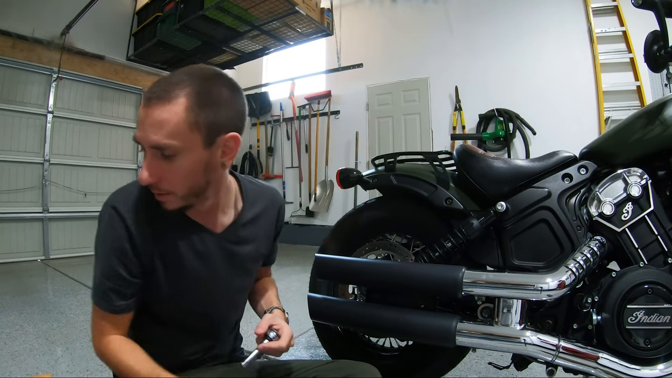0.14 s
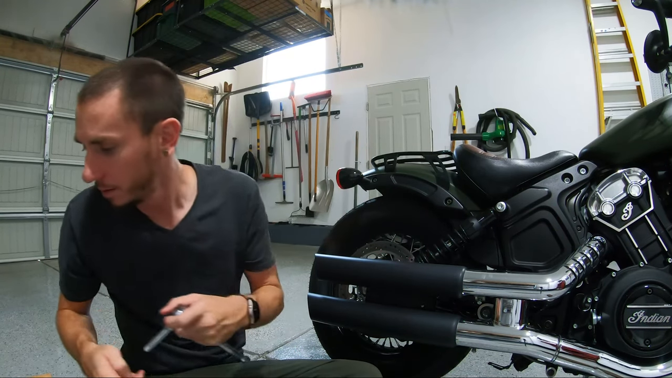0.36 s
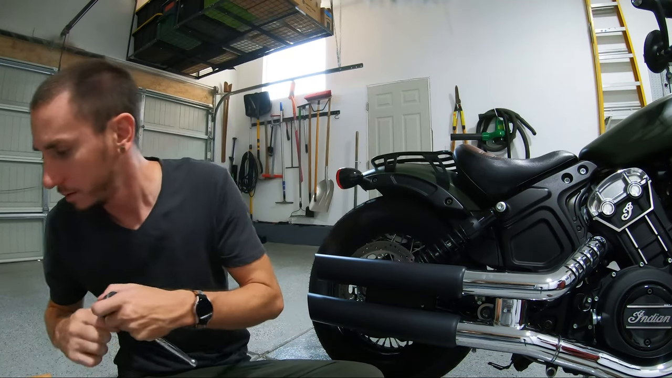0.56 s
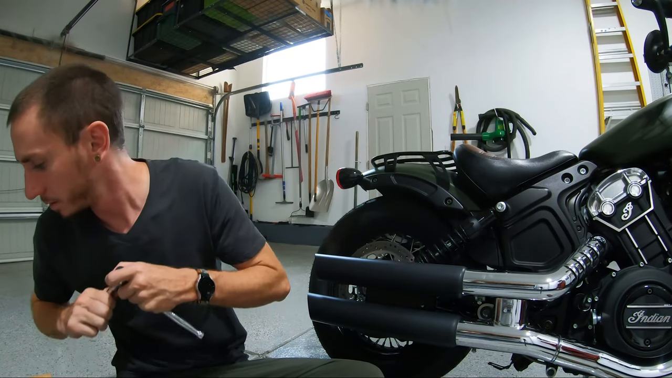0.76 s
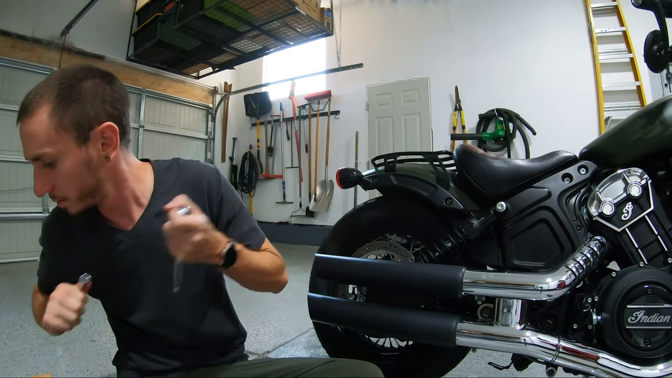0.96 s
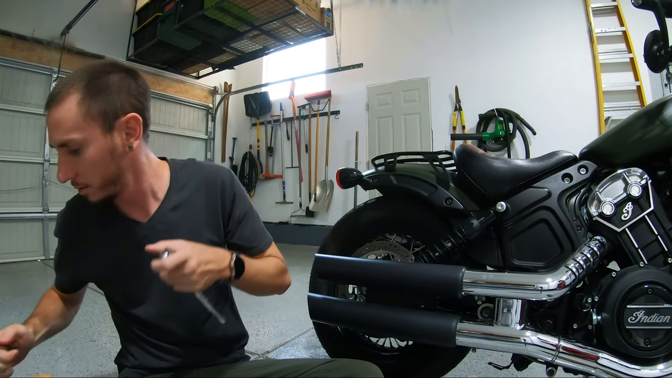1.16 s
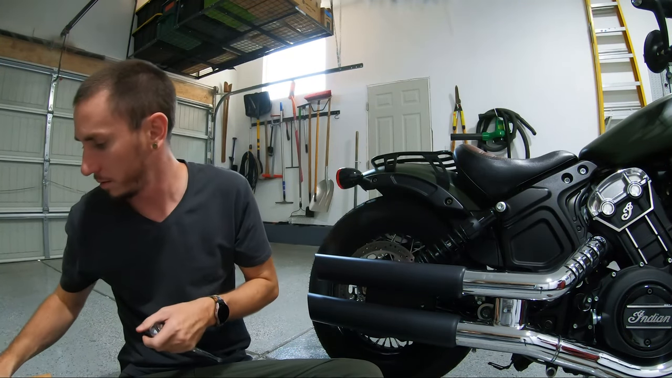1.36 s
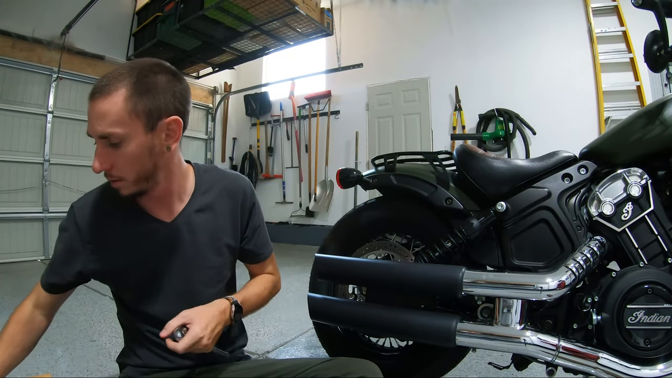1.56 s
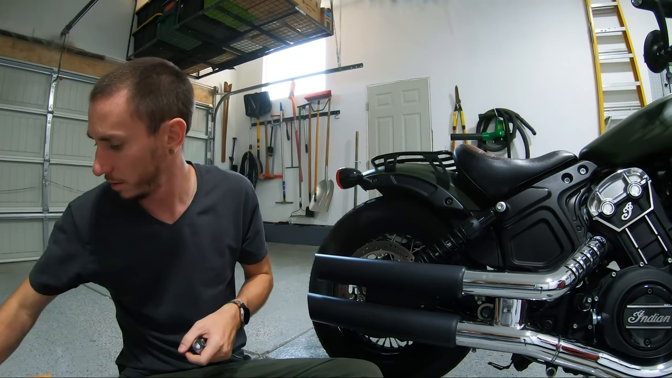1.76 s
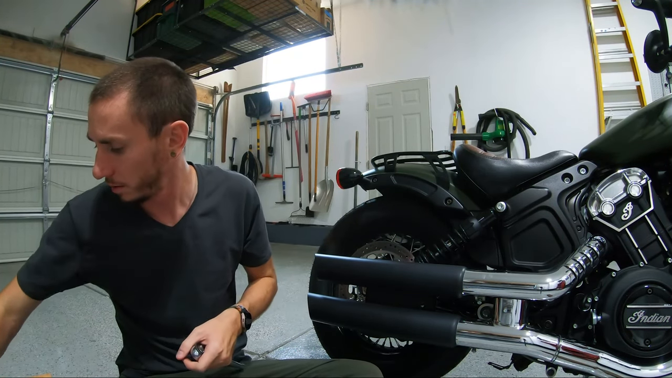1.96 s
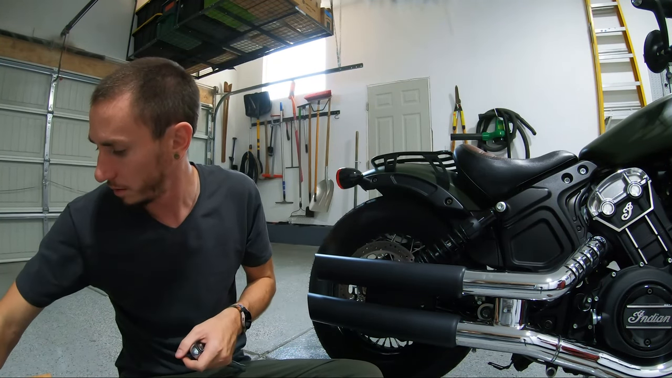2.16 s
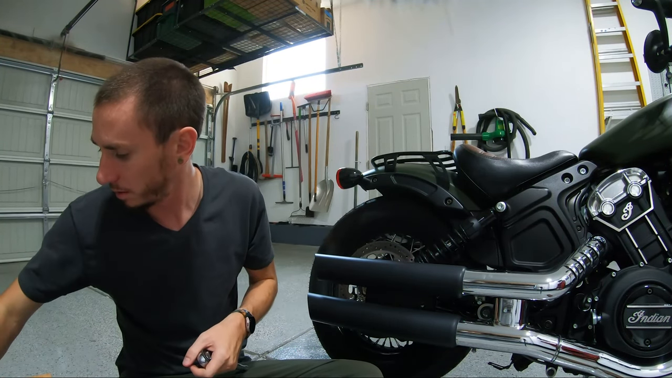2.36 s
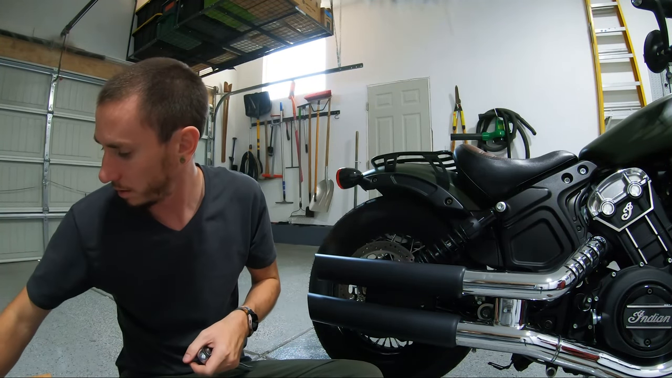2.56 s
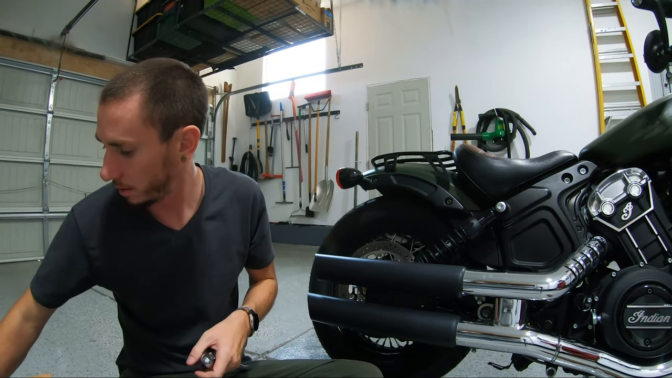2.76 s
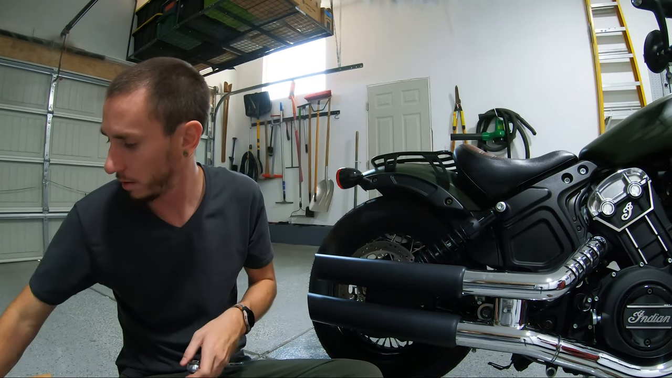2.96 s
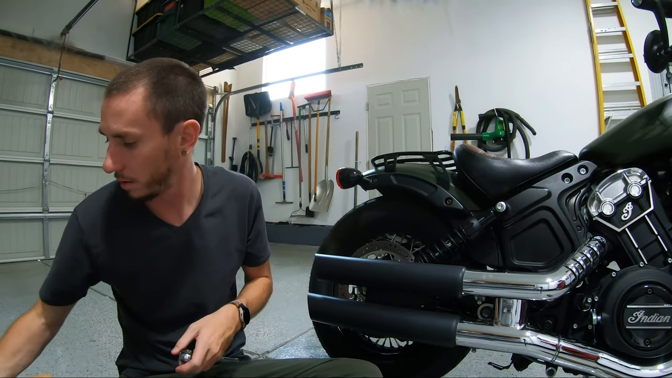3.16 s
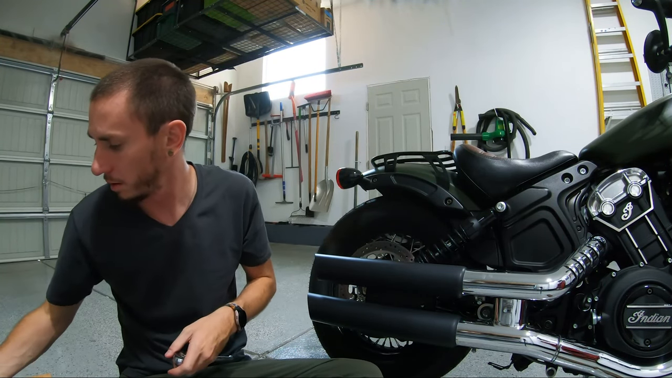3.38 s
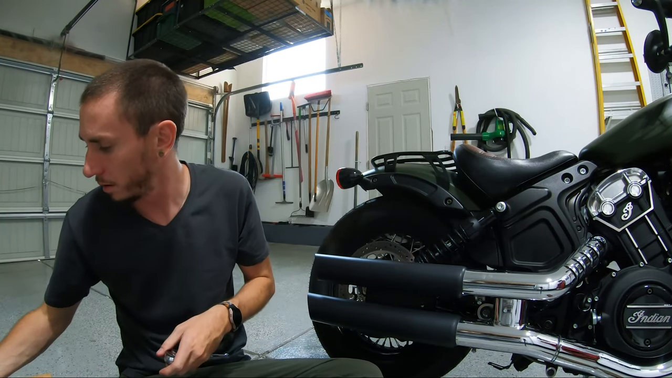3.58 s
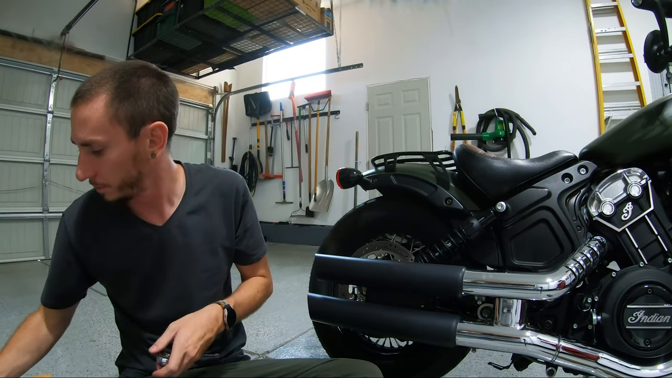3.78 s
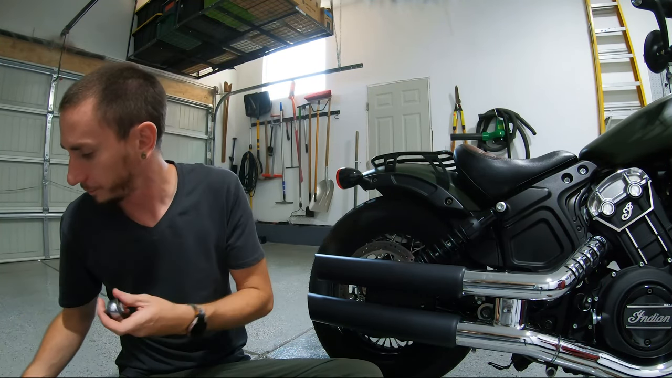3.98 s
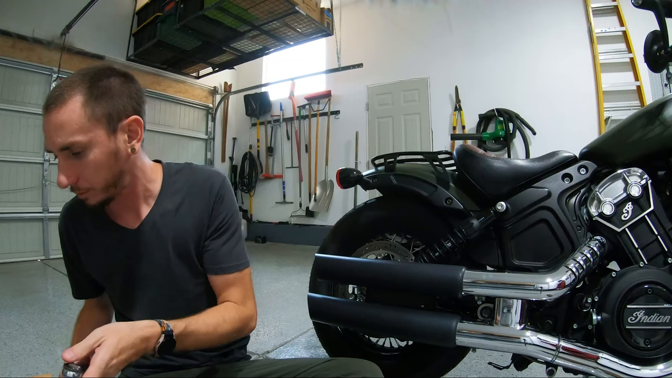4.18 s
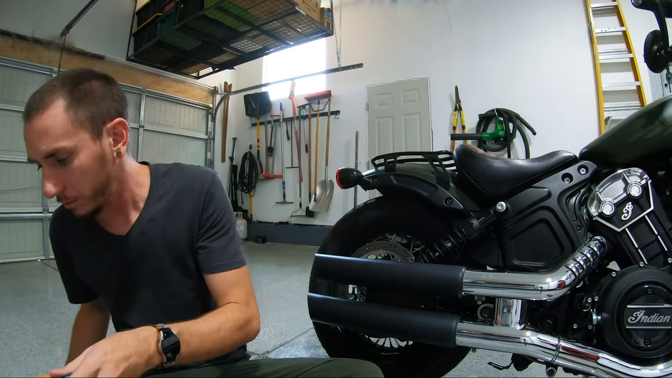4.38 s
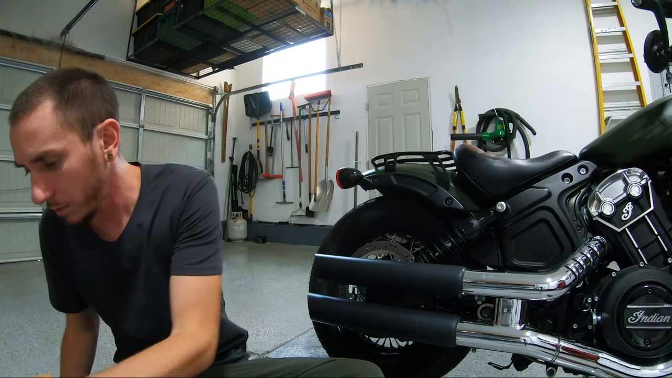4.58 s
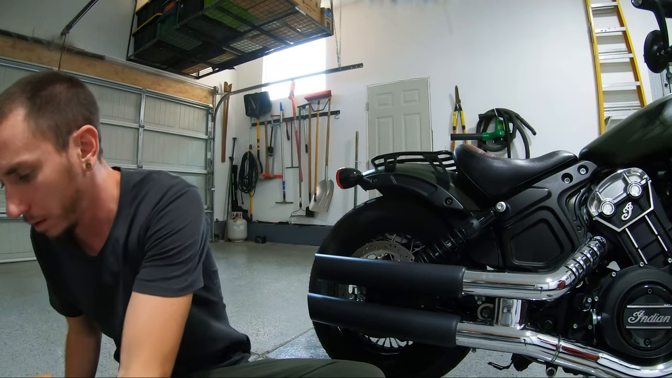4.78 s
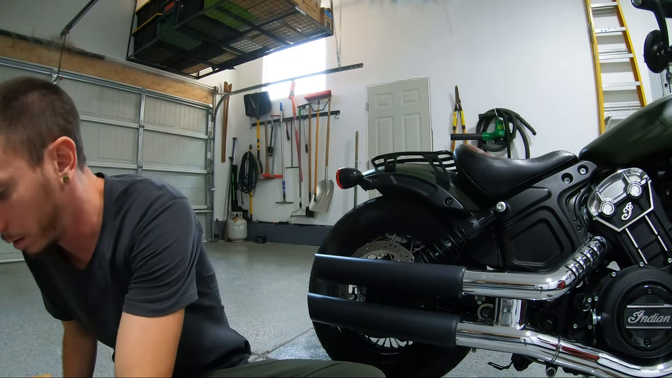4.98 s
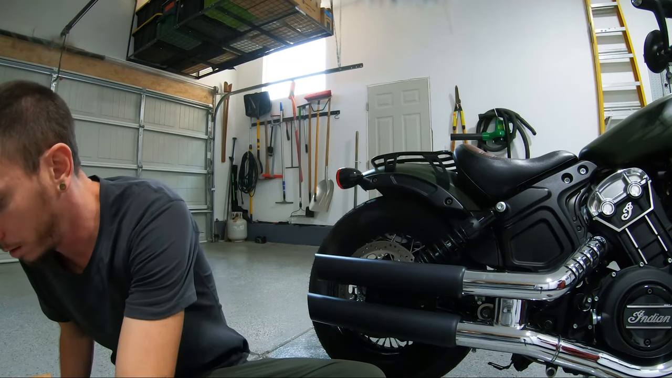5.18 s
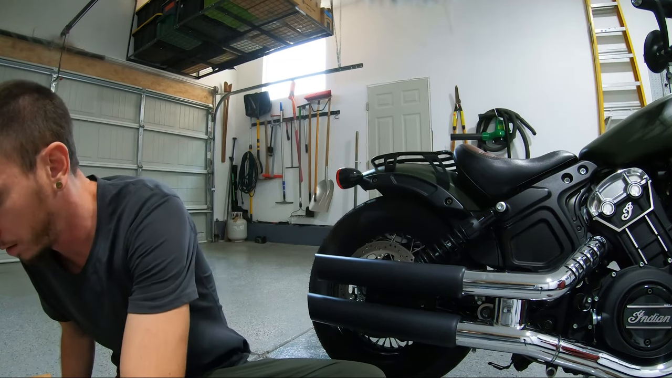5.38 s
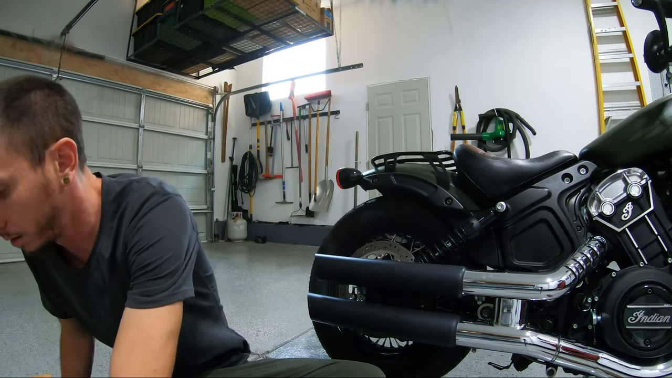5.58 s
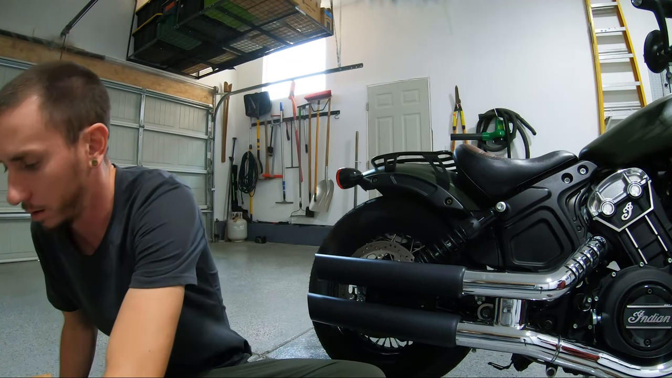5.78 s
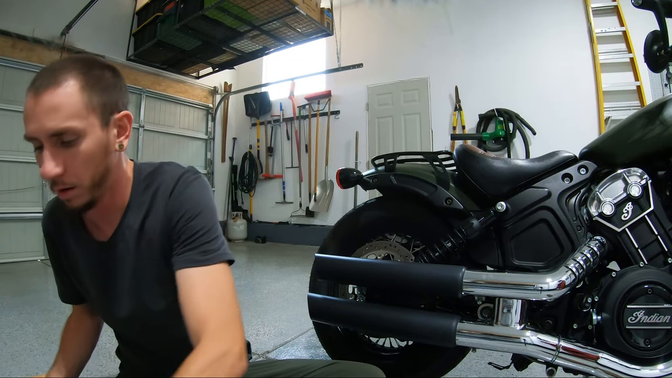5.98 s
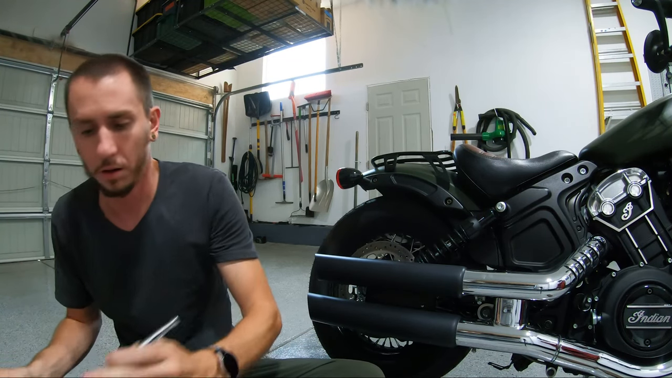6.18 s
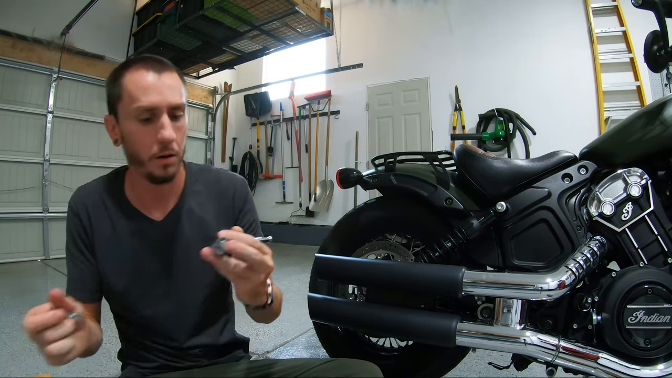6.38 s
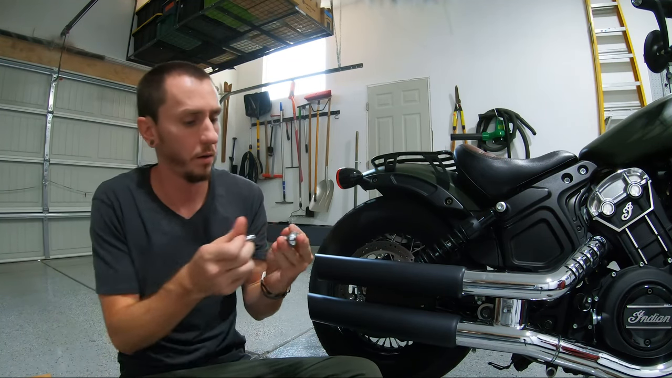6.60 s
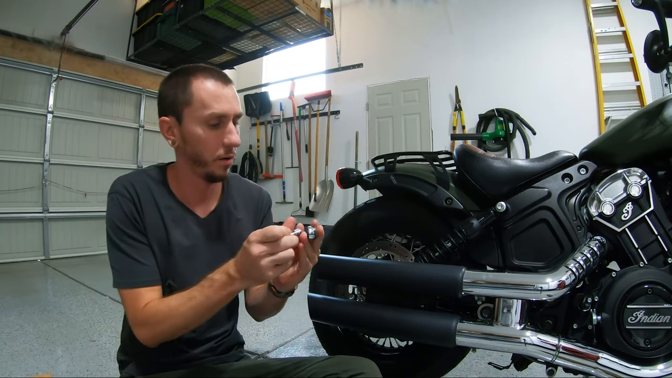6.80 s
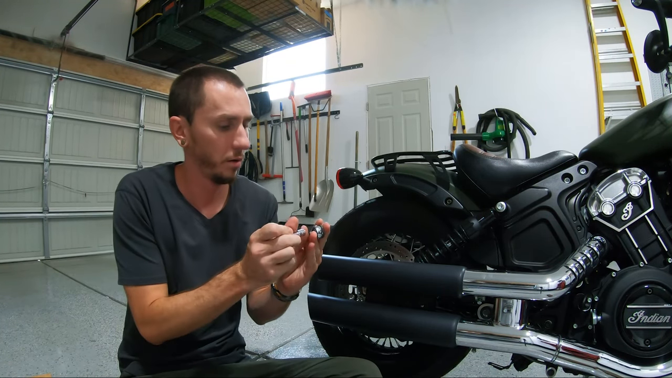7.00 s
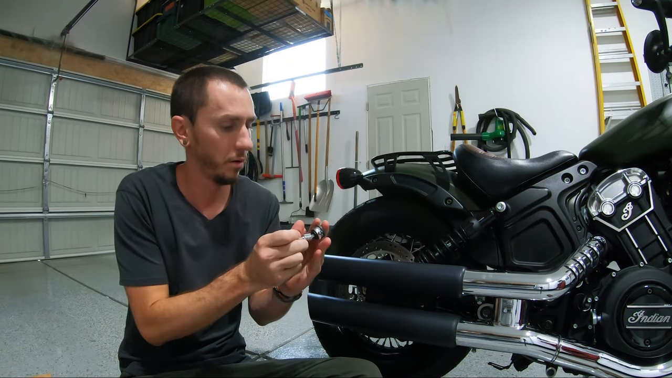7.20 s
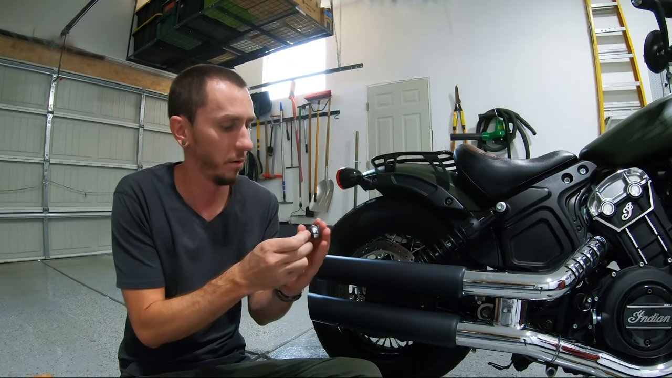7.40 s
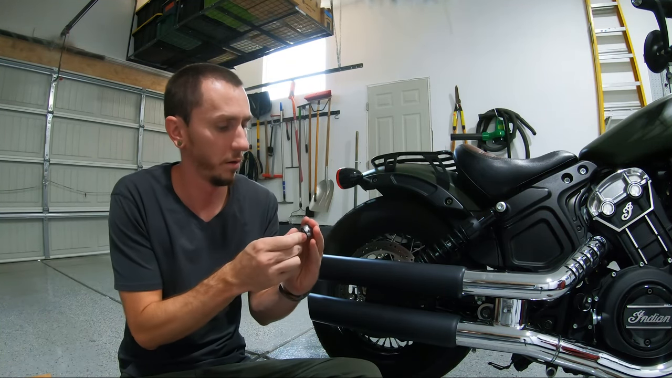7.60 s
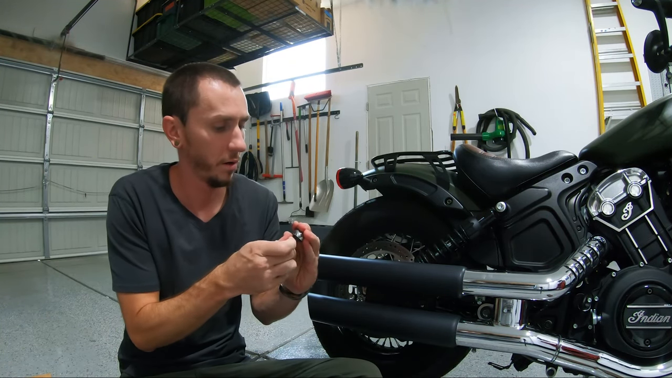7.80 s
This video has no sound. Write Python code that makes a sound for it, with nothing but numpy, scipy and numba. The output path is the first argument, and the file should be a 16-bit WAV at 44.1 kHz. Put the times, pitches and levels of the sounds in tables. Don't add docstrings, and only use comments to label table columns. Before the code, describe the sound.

A quiet low motor hum with soft air hiss runs steadily throughout in a reverberant hard-walled garage. From 0 to 1.2 s, cloth and hands rustle while thin steel clicks, the firmest around 0.75 and 1.0, mark a socket coming off a ratchet. At 2.1-2.3 s a quick cluster of hollow plastic knocks sounds as a hand rummages in the case; lighter knocks follow near 2.8 and 3.1. It is mostly quiet until soft rubbing at 4.4-4.9. Then from 4.93 to 5.45 comes the loudest passage: heavy plastic clatter, boxy thumps and high ringing of loose sockets, with an echoing tail. Small knocks trail at 5.6-5.9, with a faint steel ring. Rustling returns at 6.1-6.9. A very bright snap at 6.75 and another click at 6.89 fit the socket, then delicate taps continue, ending with a clearer click at 7.81.

```python
import sys
import numpy as np
from scipy import signal
from scipy.fft import rfft, irfft, next_fast_len
from scipy.io import wavfile
from scipy.ndimage import uniform_filter1d
from numba import njit

SR = 44100
rng = np.random.default_rng(int(sys.argv[2]) if len(sys.argv) > 2 else 0)


def digitize_waveform(pressure):
    field = np.atleast_2d(pressure).T
    bounded = np.clip(field, -1, 1)
    quanta = np.round(bounded * 32767).astype(np.int16)
    wavfile.write(sys.argv[1], SR, quanta)


def invert_db(x):
    u = np.asarray(x, float) / 20
    return 10 ** u


N = 346140
TIME = np.arange(N) / SR
SLOW = TIME[::8]


def on_log(hz, points_hz, values):
    return np.interp(np.log(hz), np.log(points_hz), values)


def shaped(x, points):
    size = next_fast_len(len(x))
    hz = np.maximum(np.fft.rfftfreq(size, 1 / SR), 1)
    return irfft(rfft(x, size) * invert_db(on_log(hz, *np.transpose(points))), size)[:len(x)]


def coloured(points, size=N):
    y = shaped(rng.standard_normal(size), points)
    return y / y.std()


def walk(rate, time):
    steps = rng.standard_normal(2048)
    return 1.78 * np.interp(time * rate, np.arange(len(steps)), steps)


@njit
def add(out, s, hz, gain, t60, phase, push_s):
    start = int(max(s, 0.) * SR)
    for m in range(len(hz)):
        z, rest = gain[m] * np.exp(2j * np.pi * phase[m]), 1.
        turn = np.exp(2j * np.pi * hz[m] / SR - np.log(1000) / (t60[m] * SR))
        for i in range(start, min(start + int(t60[m] * SR), len(out))):
            z, rest = z * turn, rest * (1 - 1 / (push_s * SR + 1))
            out[i] += z.imag * (1 - rest)


def struck(modes, times, levels_db, node_db=0):
    out = np.zeros(N)
    hz, mode_db, t60 = np.array(modes, float).T.copy()
    for s, db, node in zip(times, levels_db, rng.random((len(times), len(hz)))):
        gain = invert_db(db + mode_db + node_db * (2 * node - 2.5))
        add(out, 1. * s, hz, gain, t60, 0 * hz, .0002)
    return out


def lone_rings(events):
    return sum(struck([(hz, db, t60)], [s], [0]) for s, hz, db, t60 in events)


def evened(x, power):
    spectrum, bins = rfft(x), np.arange(len(power))
    total = np.cumsum(np.abs(spectrum) ** 2 / power)
    low, high = np.maximum(.95 * bins - 8, 0), np.minimum(1.05 * bins + 8, bins[-1])
    excess = (np.interp(high, bins, total) - np.interp(low, bins, total)) / (high - low)
    return irfft(spectrum / np.sqrt(np.clip(excess, .1, 10)), len(x))


def blows(bands_hz, times, levels_db, t60s, steep, push_s, spread, bounce_db=-60, count=40, size=4096, lead=256):
    bounce_s = .004
    out, chance = np.zeros((2, N + size)), rng.random((len(times), 3, count))
    span = bands_hz[-1] / bands_hz[0]
    for s, db, t60, (place, node, phase) in zip(times, levels_db, t60s, chance):
        hz = bands_hz[0] * span ** ((np.arange(count) + place) / count)
        smooth_db = uniform_filter1d(on_log(hz, bands_hz, db), count // 7)
        gain = invert_db(smooth_db) * 16 / np.sqrt(count) / 10
        ring_s = np.clip(t60, .003, .06) * (hz / 1000) ** -steep
        burst = np.zeros(size)
        add(burst, lead / SR, hz, gain * invert_db(6.0 * (node - 1.0)), ring_s, spread * phase, max(push_s, 1e-5))
        delays = 1 - place[0] / 2, place[1] / 2
        burst = burst + sum(invert_db(bounce_db) * np.roll(burst, int(late * bounce_s * SR)) for late in delays)
        power = gain ** 2 * ring_s * SR ** 2 * count / (8 * np.log(1000) * hz * np.log(span))
        ends_hz, ends = np.r_[0, hz, SR / 2], np.r_[power[0] / 100, power, power[-1] / 100]
        power = np.interp(np.fft.rfftfreq(size, 1 / SR), ends_hz, ends)
        start = int(s * SR) - lead
        out[0, start:start + size] += evened(burst, power)
        out[1, start:start + size] += np.roll(irfft(np.sqrt(power), size), lead + lead // 2)
    return out[:, :N]


def air():
    # f/Hz, level/dB per Hz
    hiss_points = [(20, -4), (100, -0.5), (300, -3), (450, -11.5), (2000, -25.5), (6000, -33.5),
                   (15700, -37), (16000, -75)]
    return invert_db(-58 + 1.0 * walk(3.0, TIME)) * coloured(hiss_points)


def motor(turns, orders, wobble_db):
    out = 0
    for k, db in orders:
        phase = np.round(k) * turns + np.round(k) ** 2 / 36
        swell = invert_db(db + wobble_db * walk(1.555, SLOW))
        out = out + np.sqrt(2) * swell * np.sin(2 * np.pi * phase)
    return out


def hum():
    # t/s, 21st order of the steady motor f/Hz, 2nd order of the slowing motor f/Hz
    speed = [(0, 174.9, 115.0), (1.501, 174.8, 114.75), (4.0, 174.6, 113.9), (6.001, 175.0, 113.4),
             (7.85, 175.4, 113.1)]
    # multiple of shaft speed, level/dB
    steady_orders = [(6, -60.5), (12, -72), (15, -64), (18, -59.5), (19, -71), (20, -80), (21, -53.5),
                     (22, -90.5), (23, -64), (24, -60), (25, -69), (27, -70.5), (33, -66.5), (70, -78)]
    slowing_orders = [(1, -76.5), (2, -57.5), (3, -70)]
    s, steady_hz, slowing_hz = np.transpose(speed)
    steady = np.cumsum(np.interp(SLOW, s, steady_hz)) * SLOW[1] / 21
    slowing = np.cumsum(np.interp(SLOW, s, slowing_hz)) * SLOW[1] / 2
    lines = motor(steady, steady_orders, 0.76) + motor(slowing, slowing_orders, .9)
    lines = lines + motor(38.6 * SLOW, [(1, -67)], .8)
    return signal.resample_poly(lines, 8, 1)[:N]


def rustle():
    # t/s, length/s, level/dB, bright share/dB, centre f/Hz
    rubs = [(0, 0.16, -65, 4, 1400), (0.199, 0.35, -66, -5, 1717), (0.516, 0.11, -65, -4, 2080),
            (0.641, 0.11, -66, 0.5, 2246), (0.771, 0.084, -65, -9, 1560), (0.859, 0.28, -69.5, -7, 1518),
            (1.72, 0.063, -74, -15, 1590), (2.82, .12, -71.5, 4, 1200), (4.202, .15, -80, -5, 1205),
            (4.427, 0.083, -74.5, 2.5, 1700), (4.56, .15, -76, -1.5, 1505), (4.734, .012, -64, -16, 1480),
            (4.8, 0.061, -60.5, -12, 1620), (4.876, 0.062, -64.5, -1, 1694), (6.077, 0.26, -68, -8, 1415),
            (6.36, .2, -74.5, -10.5, 1410), (6.623, 0.18, -66, -8, 1203), (6.866, 0.24, -75.5, 1, 1790),
            (7.354, 0.37, -88.5, 13, 1810)]
    start, length, level_db, share_db, start_hz = np.array(rubs).T[:, :, None]
    late = SLOW - start
    outside = np.maximum(np.maximum(-late, late - length), 0) / (0.0087 + .6 * length)
    inside = np.clip(late, 0, length)
    swell_db = level_db - 19 * outside - 6.5 * inside
    lead = swell_db.argmax(axis=0), np.arange(len(SLOW))
    columns = swell_db, share_db + 0 * late, start_hz - 330 * inside
    db, bright_db, hz = (np.interp(TIME, SLOW, uniform_filter1d(c[lead], size=64)) for c in columns)
    carrier = np.exp(2j * np.pi * np.cumsum(hz) / SR)
    slow = [coloured([(40, -0.5), (150, -6.5), (900, -13), (3000, -43.5)]) for _ in range(2)]
    hollow = slow[0] * carrier.real + slow[1] * carrier.imag
    hiss = coloured([(1500, -8.0), (3000, 6.0), (8000, -1.0), (15000, -15.5), (16000, -48)])
    return invert_db(db + 0.96 * walk(40, TIME)) * (hollow + invert_db(bright_db) * hiss)


def booms():
    # t/s, f/Hz, level/dB, T60/s
    flexures = [(2.108, 400, -32.5, 0.09), (2.115, 523, -35, 0.096), (2.108, 680, -28, 0.062),
                (2.11, 1080, -32, .04), (2.155, 695, -29, 0.033), (2.237, 297, -21, .04),
                (2.238, 1100, -23, .04), (2.277, 1360, -25, .025), (2.265, 1100, -28, 0.032),
                (2.238, 500, -33, 0.036), (2.277, 352, -21.5, 0.075), (2.278, 615, -28, .05),
                (2.278, 800, -23, .006), (3.11, 705, -33.5, 0.043), (4.929, 225, -18.5, 0.04),
                (4.933, 960, -33, 0.028), (4.933, 2070, -29, 0.02), (5.067, 350, -24, .05),
                (5.08, 206, -26.5, .08), (5.0878, 357, -17.5, 0.064), (5.1013, 520, -17.5, .008),
                (5.102, 210, -25, 0.076), (5.106, 2500, -23, .01), (5.294, 260, -11.5, 0.041),
                (5.295, 420, -22.5, .03), (5.323, 207, -17.5, 0.15), (5.371, 680, -17.5, 0.034),
                (5.371, 1000, -10, .006), (5.323, 1900, -21, .012), (5.416, 1090, -20, .02),
                (5.394, 1900, -26, .012), (5.372, 206, -17.5, .078), (5.411, 694, -15.5, 0.058),
                (5.414, 215, -16.5, 0.066), (5.4415, 900, -11, .005), (5.801, 900, -33, 0.021),
                (5.837, 590, -34, 0.038), (5.873, 620, -38, .04)]
    return lone_rings(flexures)


def case():
    # t/s, level/dB, weight (thump minus level)/dB, hardness (edge minus level)/dB
    rummage = [(2.094, -32, -7, -14), (2.107, -19.5, -15, -19.5), (2.155, -22.5, -20, -58),
               (2.181, -33, -30, -26), (2.195, -38, -20, -11), (2.222, -29, -15, -18),
               (2.236, -16.5, -6, -10.5), (2.262, -25, -2.5, -8.5), (2.277, -17, -12, -17),
               (2.302, -35, -5, -21), (2.321, -37, -19, -22), (2.76, -43, -10, -22), (2.767, -30, -18, -25),
               (2.789, -31.5, -20, -26), (2.801, -30, -23, -27), (3.072, -41.5, -26, -24),
               (3.102, -31, -21, -21.5), (3.11, -21.5, -25, -28.5)]
    rattle = [(4.792, -54, 7, -25), (4.928, -25.5, 1.5, -10), (4.933, -17, -27, -12), (5.067, -18, -8, -10),
              (5.078, -18, 4, -11), (5.088, -9, -12.5, -13), (5.1, -7, -8.5, -17.5), (5.106, -16, -21, -11),
              (5.112, -24.5, -21.5, -11), (5.2935, -9.5, -11.5, -12.5), (5.299, -17.5, -1, -13.5),
              (5.3234, -7, -14, -12.5), (5.344, -17.5, -24, -9), (5.353, -24.5, -21.5, -9),
              (5.365, -25.5, 0, -14.5), (5.37, -4, -23.5, -26.5), (5.392, -11.5, -11, -18.5),
              (5.411, -10, -13, -16.5), (5.415, -11.5, -6.5, -9.5), (5.423, -19.5, -13, -17),
              (5.441, -18, -8, -15), (5.57, -27, -18, -4), (5.681, -27.5, -30.5, -12),
              (5.8, -35.5, -11, -18), (5.821, -32.5, -13, -7.5), (5.836, -22, -22, -16),
              (5.874, -39, -26, -20)]
    # f/Hz, level/dB
    plastic = [(150, -1.5), (210, 0), (850, -1), (2400, 2), (4000, 1), (4750, -2), (5500, 0.5), (13000, 1)]
    s, body, thump, edge = np.transpose(rummage + rattle)
    shaken = np.arange(len(s)) >= len(rummage)
    sparkle = np.where(shaken, -15.5, -17.5) + 0.65 * edge
    t60 = np.where(shaken, 0.027, 0.049)
    bands_hz = np.array([120, 280, 1000, 2200, 4500, 11000, 15900])
    shape = [thump - 6, thump + 5, 0 * s, 0.39 * edge, edge + 8, sparkle + 7, sparkle - 13]
    levels_db = (body + 1.7 + np.array(shape)).T
    knocks = blows(bands_hz, s, levels_db, t60, steep=0.47, push_s=0.00074, spread=0.62,
                   bounce_db=-6.5, count=160)
    return [shaped(row, plastic) for row in knocks]


def loose_sockets():
    # t/s, large socket level/dB, middle level/dB, small level/dB
    jolts = [(5.0742, -30, -58.5, -53.5), (5.088, -24.5, -44.5, -30), (5.0931, -26.5, -45.5, -26.5),
             (5.099, -31.5, -29.5, -40.5), (5.112, -25, -43, -26.5), (5.294, -34.5, -58, -45.5),
             (5.3238, -28, -48, -35), (5.3447, -29, -46.5, -26.5), (5.3678, -20, -58.5, -39.5),
             (5.414, -31.5, -43, -27), (5.4417, -23.5, -61, -46)]
    # f/Hz, level/dB, T60/s
    large_modes = [(7254, -7, .26), (7312, -10, .22), (7285, -7, .022), (7150, -10, .01), (4170, -10, .07),
                   (5790, -14, .08), (6889, -14, .14)]
    middle_modes = [(9858, -4, .18), (9882, -6, .13), (9900, -2, .025), (13360, -27, .12), (5512, -14, .07)]
    small_modes = [(11022, -11, .16), (11050, -11, .12), (11100, -7, .025), (14920, -20, .06),
                   (15710, -21, .12)]
    s, large, middle, small = np.transpose(jolts)
    out = struck(large_modes, s, large - 3, node_db=3)
    out += struck(middle_modes, s, middle + 3, node_db=3)
    return out + struck(small_modes, s, small, node_db=3)


def tools():
    # (t/s, level/dB)
    handle = ([(1734, 1, 0.22), (1680, -2, 0.3), (1970, 3, 0.33), (2840, -2, 0.28), (2720, -3, .35),
               (2950, -6, 0.22), (6400, -2, 0.12), (4450, -10, .3), (4930, -8, 0.26)], [(0, -59)])
    extension = ([(1660, -5, 0.22), (1560, -8, .1), (1900, 4, .05), (2710, -3, 0.14), (2570, -6, 0.14),
                  (5350, -4, 0.095), (4250, -5, .04)], [(.118, -56.5)])
    drive = ([(4330, 2, 0.0064), (6570, -6, 0.008), (3600, -7, 0.0089), (7100, 2, 0.008), (8000, -5, .008),
              (11070, -24, .04), (1590, -37, .4)], [(.752, -33)])
    old_socket = ([(3340, -4, 0.0074), (3940, 4, 0.02), (7080, -4, .015), (5950, -11, .008),
                   (7483, -15, 0.6), (9000, 0, .006), (9790, -4, 0.04), (11850, 0, 0.015)], [(.986, -42.5)])
    nudged = ([(5540, -17.5, 0.28), (5420, -16, .04), (6800, 2.5, .008), (7200, -7, .008),
               (6600, -23, .15)], [(2.801, -40)])
    divider = ([(5425, 3, 0.012), (5800, -1.5, 0.025), (6300, -10, .02)], [(5.294, -42.5), (5.346, -33),
                (5.415, -30.5), (5.422, -28), (5.441, -36)])
    bar = ([(1226, 3, .05), (1290, -12, 0.6), (1400, -20, 1), (1717, -12, 0.15), (3400, 7, 0.016),
            (3400, -22, 0.35), (3200, -18, .45), (3870, -18, 0.18), (2760, -4, 0.022), (6100, -12, .006)],
            [(5.836, -40.5), (5.874, -56), (6.01, -60)])
    # t/s, f/Hz, level/dB, T60/s
    pings = [(.28, 1605, -66, 0.72), (.62, 7483, -72, .3), (1.21, 5800, -61, .035), (1.248, 5930, -64, .03),
             (1.248, 3400, -60, .015), (2.096, 6980, -38.5, 0.0088), (3.11, 6700, -41.5, 0.008),
             (4.928, 7220, -26.5, 0.0077), (5.074, 7200, -43, .3), (5.801, 8000, -54, .25),
             (5.801, 6600, -45, 0.011), (5.821, 3850, -40, .02), (5.821, 5200, -46, .02),
             (5.111, 4170, -38, 0.036), (5.324, 4120, -40, .08), (5.385, 5800, -42, .1),
             (7.155, 2510, -51.5, 0.021), (7.816, 2420, -39, .02), (7.815, 7410, -40.5, .011),
             (7.815, 8860, -39, .012), (4.728, 858, -62, .05), (4.802, 860, -54, .04),
             (.62, 6900, -49, .01), (5.801, 14620, -53, .015)]
    out = lone_rings(pings)
    for modes, strikes in handle, extension, drive, old_socket, nudged, divider, bar:
        out += struck(modes, *np.transpose(strikes))
    return out


def chattering_steel():
    return (loose_sockets() + tools()) * invert_db(2.5 * walk(140, TIME))


def held_socket():
    # t/s, wall level/dB, bore level/dB
    taps = [(6.753, -60, -49), (6.889, -39, -56), (6.969, -52, -60), (7.155, -49, -60), (7.417, -41.5, -43),
            (7.584, -52, -63), (7.816, -46, -56.5)]
    # f/Hz, level/dB, T60/s
    wall_modes = [(6660, 2, 0.025), (7920, -14, .015)]
    bore_modes = [(2613, 0, 0.021), (3370, 1, .015), (4790, 2, 0.019), (5320, 6, 0.013)]
    s, wall, bore = np.transpose(taps)
    return struck(wall_modes, s, wall) + struck(bore_modes, s, bore)


def fitted_socket():
    # t/s, level/dB
    snaps = [(6.753, -12), (6.8878, -22.5), (7.1554, -44), (7.4177, -45.5), (7.814, -31.5)]
    # f/Hz, level/dB, T60/s
    fitted_modes = [(13925, 2, 0.021), (14100, -13, 0.05), (13720, -13.5, .04), (6700, -37, 0.087),
                    (9000, -8, .004), (16500, -16, .004)]
    return struck(fitted_modes, *np.transpose(snaps))


def steel_clicks():
    # t/s, level near 7 kHz/dB, mass (2 kHz minus level)/dB, snap (13 kHz minus level)/dB
    clicks = [(0.118, -50.5, -2.5, -10), (0.62, -47, -7, -13), (0.7514, -36.5, -19, -13),
              (0.9854, -35, -17.5, -1), (1.21, -55, -22, -30), (1.248, -58, -13, -29), (2.596, -65, -5, -6),
              (2.6277, -65, 7, -4), (2.76, -55, -12, -14), (2.912, -61, -10, -10), (2.931, -65, -10, -12),
              (4.439, -58, -2, -16), (5.3683, -24.5, -10, -16), (5.802, -43, -22, -14),
              (5.819, -46, 3, -22), (6.7527, -34.5, -13, 2), (6.8889, -35, -13.5, -4),
              (6.969, -45.5, -14, -20), (7.155, -38.5, -24, -15), (7.1813, -52, -8, -26),
              (7.3567, -57, -11, -24), (7.4179, -39, -16, -11), (7.555, -52.5, -8, -26),
              (7.5844, -48, -16, -33), (7.6206, -58.5, -10.5, -17), (7.638, -49.5, -14, -7),
              (7.8141, -34, -20.5, -6)]
    s, top, low, high = np.transpose(clicks)
    bands_hz = np.array([800, 2100, 4000, 7000, 13000, 16800])
    shape = [low - 18, low, -7.5 + 0.32 * low + 2.5, 0 * s, high - 4, high - 8]
    levels_db = (top + 11 + np.array(shape)).T
    return blows(bands_hz, s, levels_db, 0.016 + 0 * s, steep=0.12, push_s=0.00016, spread=0.3, count=120)


def garage(direct, sent):
    # f/Hz, T60/s, tail level/dB
    room = [(150.3, 0.48, -3.5), (416, 0.83, -2), (1002, 0.89, -0.5), (2500, 0.87, -2.5), (4993, 0.81, -1),
            (8900, 0.52, -1), (15000, .42, 2)]
    # delay t/s, level/dB
    reflections = [(.0047, -11), (.0095, -17.5), (.022, -27)]
    t = TIME[:SR]
    room_hz, t60, tail_db = np.transpose(room)
    skirt_db = -40, -8.3, -3, -.7, 0, -.7, -3, -8.3, -40
    tail = 0
    for hz in 100 * 2 ** np.arange(0, 7.3, .5):
        band = coloured([(hz * 2 ** (k / 8), db) for k, db in zip(range(-4, 5), skirt_db)], size=SR)
        fall = np.log(1000) / on_log(hz, room_hz, t60)
        level = invert_db(on_log(hz, room_hz, tail_db)) * np.sqrt(fall * hz) / SR
        tail = tail + band * np.exp(-fall * t) * level
    tail = tail * (1 - np.exp(-(t / 0.0044) ** 2))
    echoes = sum(invert_db(db) * np.roll(direct, int(late_s * SR)) for late_s, db in reflections)
    return direct + echoes + signal.fftconvolve(sent, tail)[:N]


def scene():
    knocks, floor = case(), booms()
    held, rings = held_socket(), chattering_steel()
    clicks, snaps = steel_clicks(), fitted_socket()
    sent = invert_db(2.5) * knocks[1] + invert_db(-4.5) * clicks[1] + invert_db(-18) * snaps
    sent = sent + invert_db(-1.5) * rings + invert_db(-3.5) * held + invert_db(-2.5) * floor
    hits = garage(clicks[0] + snaps + rings + held, sent) + knocks[0] + floor
    hits = signal.sosfilt(signal.butter(3, 165, "high", fs=SR, output="sos"), hits)
    mid = hits + rustle() + hum() + air()
    return np.array([mid, mid])


def roll_off(x):
    return signal.sosfilt(signal.butter(12, 17050, fs=SR, output="sos"), x)


def record(dry):
    # f/Hz, side minus mid level/dB
    side_levels = [(30, -31), (100, -43.5), (1000, -53), (2400, -38.5), (4400, -31), (8000, -26.5),
                   (11000, -26), (14000, -31)]
    # f/Hz, level/dB per Hz
    side_hiss = [(60, 1.5), (300, 3), (1000, -1), (4000, -2.5), (11000, -4), (13000, -4), (16000, -34)]
    side = shaped(dry[0] * walk(200, TIME), side_levels) + invert_db(-82) * coloured(side_hiss)
    rounded = np.tanh(dry)
    top = signal.ellip(8, .2, 60, 16300, fs=SR, output="sos")
    mix = signal.sosfilt(top, rounded + np.array([side, -side]))
    return roll_off(mix)


dry = scene()
out = record(dry)
digitize_waveform(out)
```